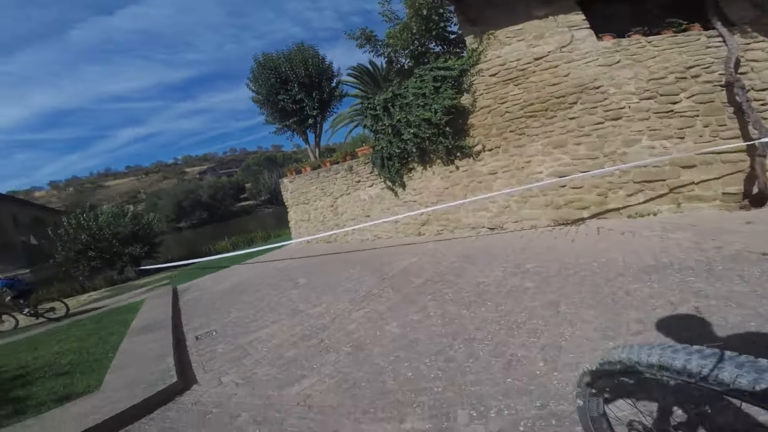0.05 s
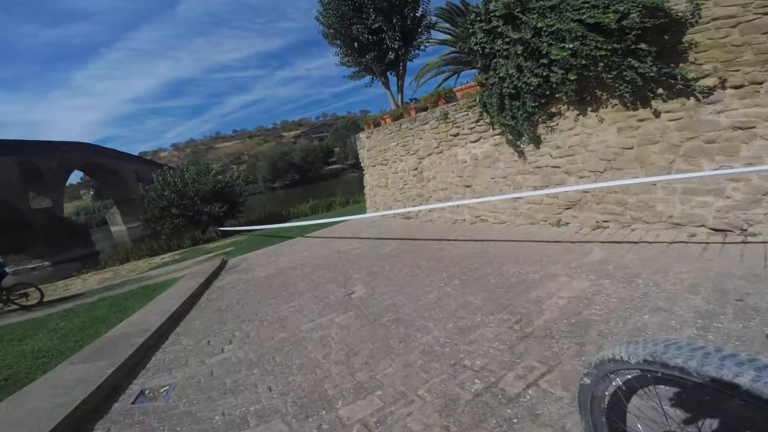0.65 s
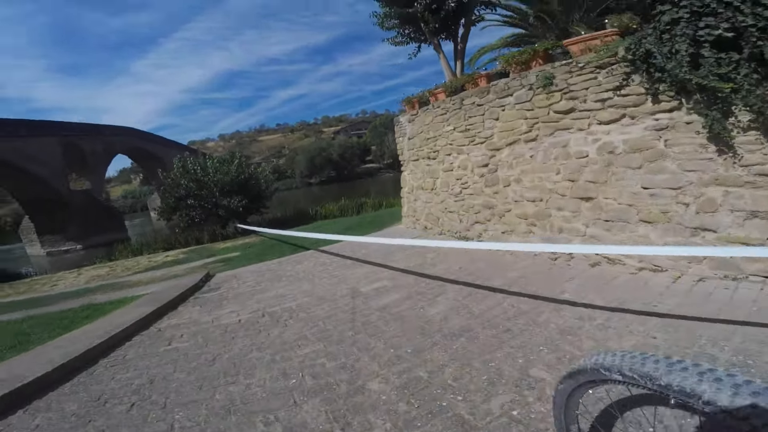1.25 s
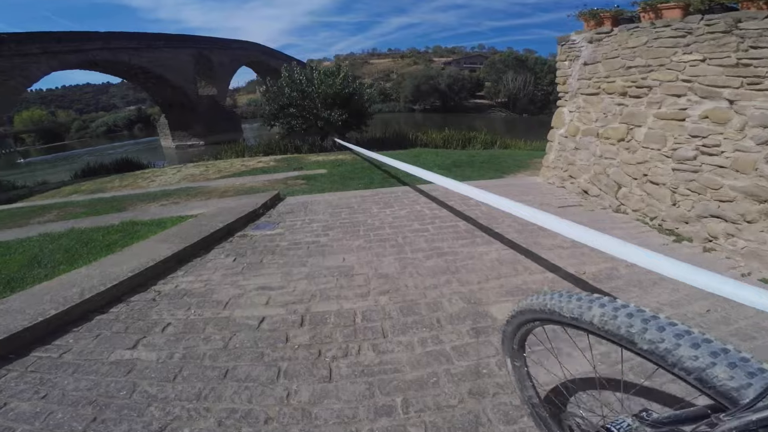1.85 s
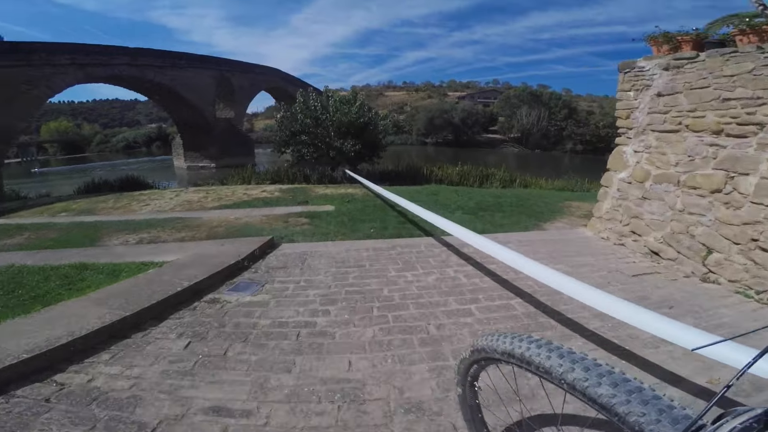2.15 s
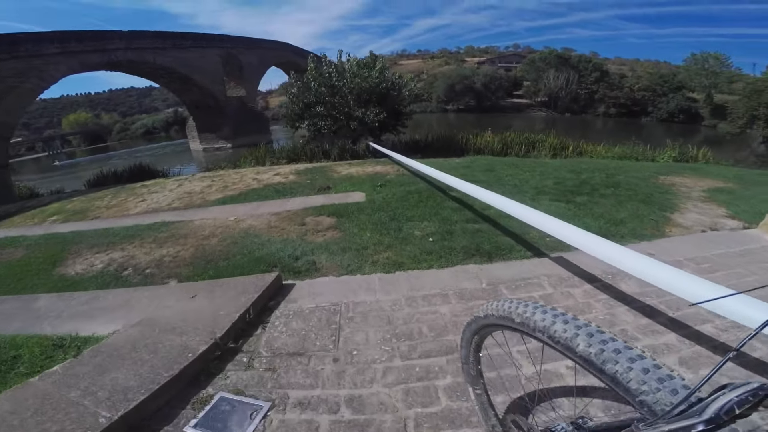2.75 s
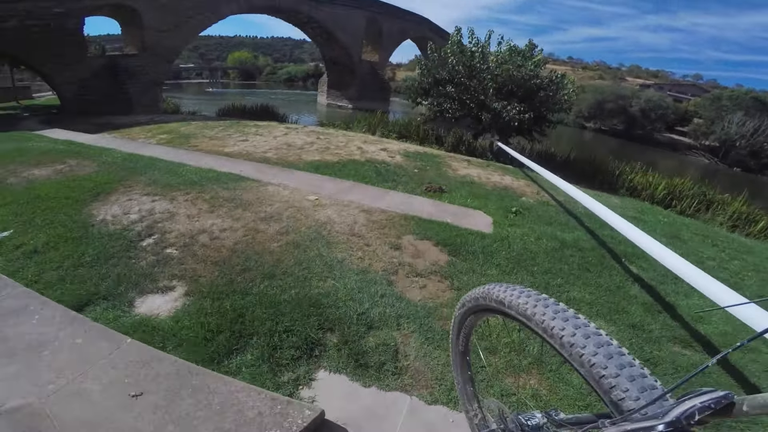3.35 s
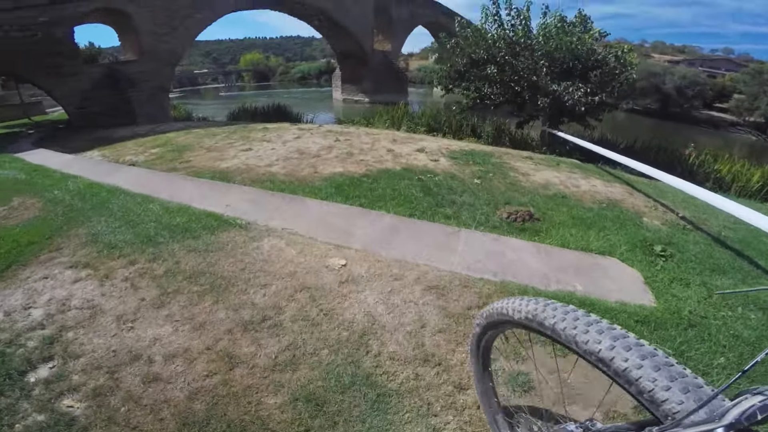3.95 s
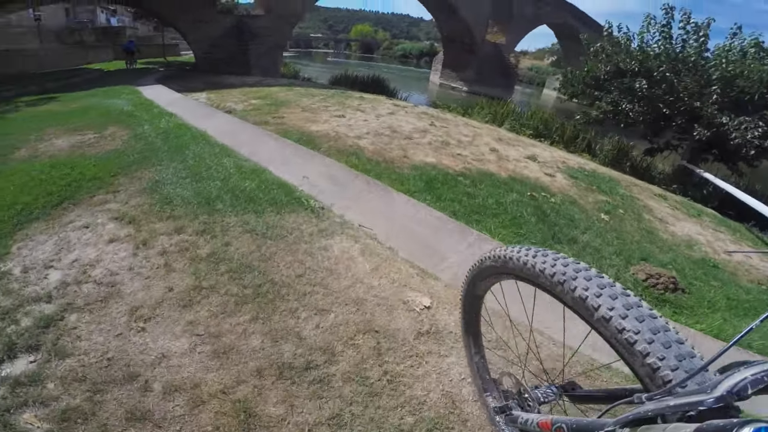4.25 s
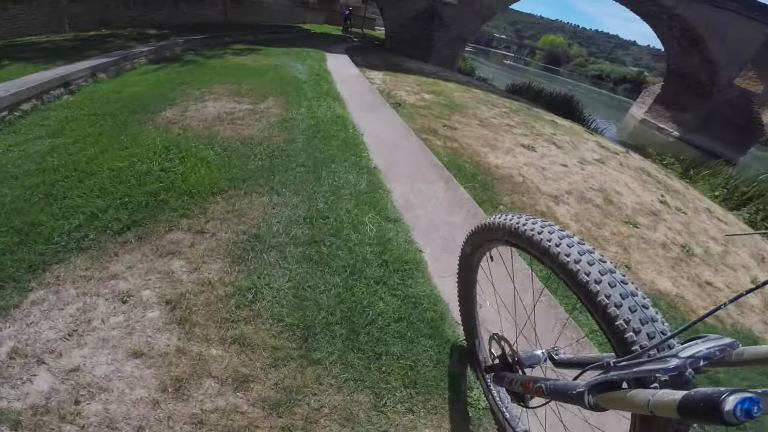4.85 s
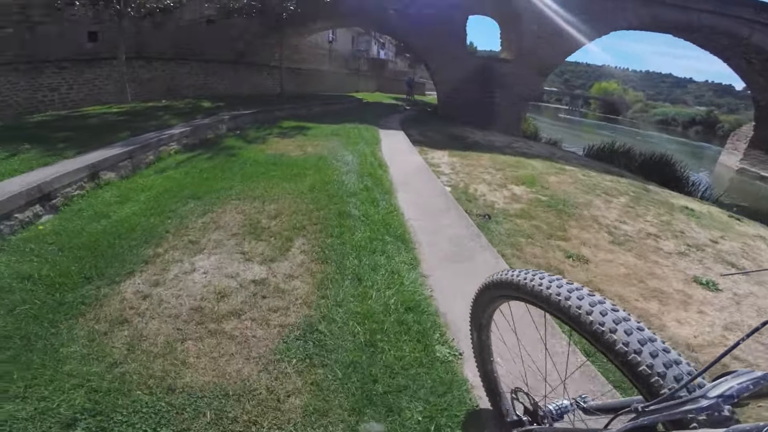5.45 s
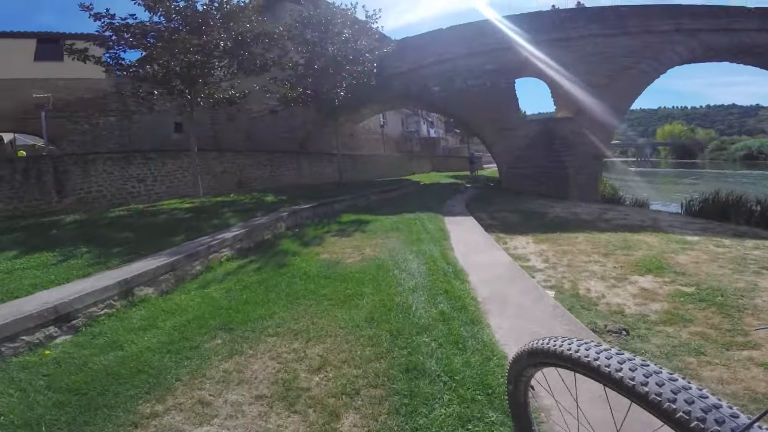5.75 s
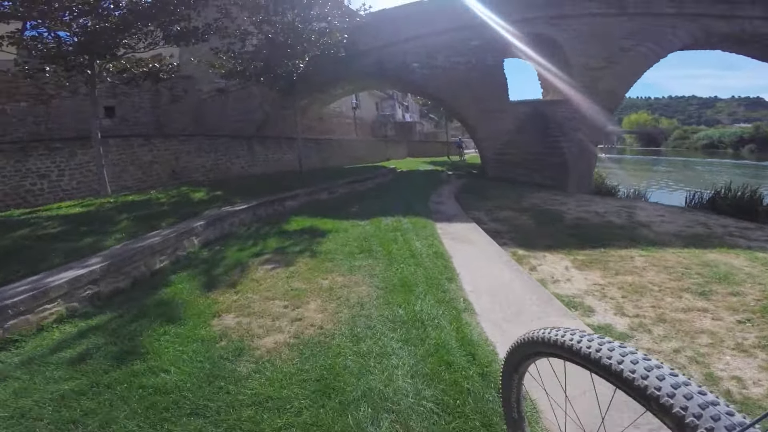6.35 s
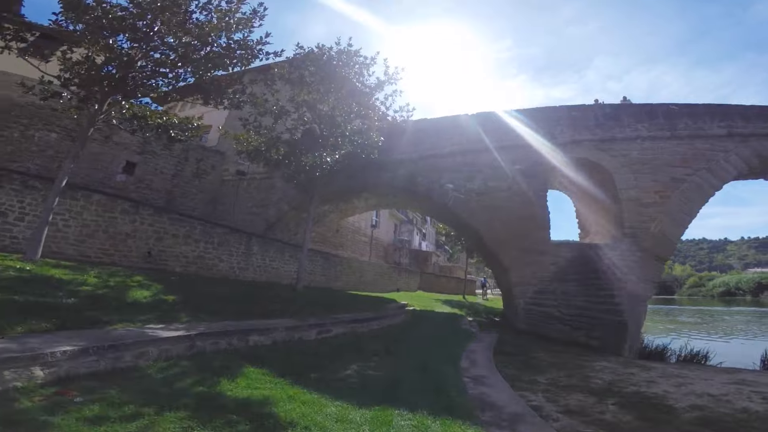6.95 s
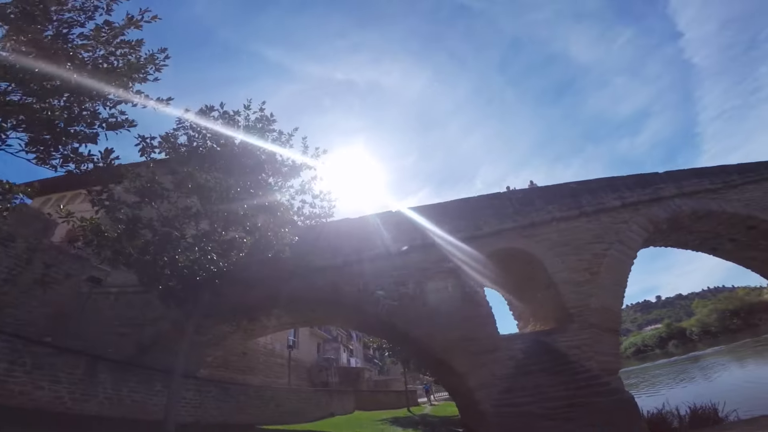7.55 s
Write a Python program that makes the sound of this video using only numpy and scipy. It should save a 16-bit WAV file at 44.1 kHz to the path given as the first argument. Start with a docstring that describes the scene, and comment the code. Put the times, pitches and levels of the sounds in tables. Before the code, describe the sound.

A mountain bike is heard close up from a microphone on the rider. From the start, a loose, hard fitting clacks sharply and irregularly, bouncing and ringing briefly, with light ticking between hits and low wind rumble underneath. The tyres roar, hiss and hum softly on stone paving. A brake disc gives thin, very high squeals around 0.4 seconds and again between 2 and 3 seconds. There is a dull bump at 1.6 seconds. From 3 to 4.3 seconds, low thuds and hard clacks bunch together as the bike drops down a step onto grass. It goes much quieter around 4.5 seconds, with a faint brake hiss. Clacks return near 4.9 seconds and grow busy from 5.5 to 6.4, with two thuds around 6. After that come only a few clacks and faint grass swishes, and the wind buffets harder from about 7.3 seconds to the end.

```python
"""Sharp clacks and chatter over a low rumble: a mountain bike rolls over stone paving, drops down a step
and runs out on grass, heard from a camera on the rider. Every jolt throws a loose, hard fitting beside
the microphone, which strikes, bounces and rings. Wind and bumps make the rumble. The tyres roar, hiss
and hum on the stone and swish through the grass, and now and then a brake disc rubs and sings thinly."""
import sys
import numpy as np
from scipy import signal
from scipy.fft import rfft, irfft
from scipy.io import wavfile
from scipy.ndimage import uniform_filter1d, minimum_filter1d

SR = 44100
rng = np.random.default_rng(int(sys.argv[2]) if len(sys.argv) > 2 else 0)


def int16_out(signal):
    """Quantize to a 16-bit WAV file."""
    q = np.round(np.clip(np.atleast_2d(signal).T, -1, 1) * 32767)
    wavfile.write(sys.argv[1], SR, q.astype(np.int16))


N = 340011
T = np.arange(N) / SR
LEAD = 256  # samples set aside for sliding before each blow
MIDDLING_DB = -30  # the level of a medium jolt

# Jolts that throw the loose fitting. Each row: time in seconds, level over the first 10 ms in dB,
# chatter time in ms, first rebound in dB compared with the blow.
JOLTS = [(.0067, -28.5, 11.5, -21), (0.1102, -24, 2.5, -27), (0.1623, -31, 1.3, -11),
         (0.1829, -23, 1.2, -8), (0.2624, -35, 0.89, -12), (.319, -28, 1, -9), (0.47, -29.5, 1.6, -33),
         (0.4752, -16, 0.8, -33), (0.5056, -17, 1.4, -30), (0.5515, -26.5, 1.2, -42),
         (0.58, -19, 1.5, -14.5), (0.6845, -25.5, 0.96, -8), (0.7779, -29.5, .5, -35),
         (.8152, -27.5, 1.1, -5), (0.9067, -17.5, 0.3, -27), (0.9571, -24, 1.5, -29),
         (1.031, -28.5, 1.4, -15), (1.203, -37.5, 1, -2.5), (1.322, -24.5, 1.1, -28),
         (1.3559, -22, 2.9, -18), (1.4189, -28, 2.1, -9), (1.455, -24.5, 0.96, -9), (1.51, -38.5, 1.2, -24),
         (1.5651, -35, 0.42, -9), (1.6417, -27, 3.1, -11.5), (1.744, -38, 1.9, -8),
         (1.841, -32.5, 2.1, -12), (1.8788, -30, 0.96, -1), (1.9526, -36.5, 1.4, -15),
         (1.996, -36.5, 2.2, -28), (2.1128, -35, 1.1, 1), (2.1525, -29.5, 1.2, -7.5),
         (2.2299, -23.5, 0.37, -8.5), (2.2618, -36.5, 2.7, -7), (2.3732, -31, 3.6, -3.5),
         (2.3939, -20, 0.37, -20), (2.4753, -30, 1.9, -16), (2.637, -26, 0.2, -17), (2.6733, -39, 2.8, -20),
         (2.7476, -38, 3.6, -8), (2.9771, -31.5, 1.8, -11), (3.0626, -28, 2.1, -35),
         (3.118, -37.5, 2.1, -29), (3.144, -27, 2.6, -15), (3.1519, -23, 1.1, -36), (3.184, -19, 2.5, -46),
         (3.214, -39, .9, -2.5), (3.2658, -30.5, 2.1, -1), (3.2995, -25, 0.38, -14),
         (3.322, -33.5, 3.4, -30), (3.4377, -28, 1, -7.5), (3.4795, -24.5, 0.82, -20),
         (3.5053, -25.5, 0.74, -41), (3.5315, -26.5, 1.2, -7), (3.5765, -34, 0.67, -2),
         (3.6184, -26.5, 2.2, -32), (3.6374, -22.5, 0.71, -21), (3.6674, -34.5, 3.1, -19),
         (3.69, -28, 2.8, -11), (3.721, -15.5, 0.84, -21), (3.7424, -32.5, 0.73, -2.5),
         (3.8678, -35, 7.5, -4), (3.927, -36.5, 1.4, -5.5), (4.015, -30, 1.8, -42), (4.038, -29, 2.5, -37),
         (4.1303, -27, 3.5, -3), (4.153, -19.5, 1.7, -11), (4.1934, -26, 5.4, -29), (4.2382, -41, 3.9, -23),
         (4.2817, -44.5, 3, -2.5), (4.4646, -44.5, 2.1, -24), (4.762, -47.5, 1.4, -26),
         (4.83, -44, 0.95, -28), (4.862, -31, 4.5, -31), (4.8841, -30, 1.3, -10), (4.9308, -46, 0.8, -29),
         (4.9843, -24.5, 1.1, -8.5), (5.041, -36, 2.7, -38), (5.147, -39.5, 1.5, -32),
         (5.1655, -44, .6, -39), (5.2124, -40.5, 0.4, -34), (5.3128, -49, 1.1, -20),
         (5.3536, -44, 1.3, -29), (5.373, -38, 3, -33), (5.4139, -33.5, 1.8, -32), (5.5054, -37, 1.9, -15),
         (5.54, -26.5, 0.84, -21), (5.5779, -35, 2.8, -26), (5.6189, -40, .6, -0.5),
         (5.6698, -26, 1.4, -9.5), (5.7733, -35.5, 1.2, -16), (5.8085, -23.5, 0.76, -22),
         (5.8225, -26, 4.7, -24), (5.9331, -27, 1.4, -5.5), (5.969, -23, 7.7, -26),
         (6.0249, -34.5, 1.6, -50), (6.0564, -22, 1.8, -44), (6.098, -39.5, 1.5, -2),
         (6.1299, -28, 1.1, -15), (6.169, -22, 3.7, -33), (6.2101, -41.5, 1.1, 1), (6.2452, -28, 0.31, -21),
         (6.276, -23, 5.4, -31), (6.3285, -46.5, 1.6, -32), (6.4027, -20, 0.55, -16.5),
         (6.43, -27, 3.4, -23), (6.514, -36.5, 1.8, -38), (6.635, -44.5, 1.9, -38), (6.9752, -48, 1.6, -25),
         (7.0301, -28, 1.5, -37), (7.1435, -30.5, 0.72, -11), (7.4931, -32.5, 0.57, -12.5)]
# The notes the fitting rings with. Each row: pitch in Hz, width in Hz (wider dies sooner), level in dB.
FITTING_NOTES = [(861, 46, -12.5), (1144, 190, -16), (1656, 83, -33), (1840, 480, -8), (2360, 100, -12.5),
                 (3897, 690, -8.5), (3880, 94, -12), (4315, 56, -10.5), (4834, 131, -2.5), (5770, 46, -16),
                 (6116, 380, -3), (7300, 640, -3.5), (8234, 500, -5.5), (7880, 1300, -7), (9975, 420, -9.5),
                 (12000, 1500, -7.5), (11870, 3200, -7.5), (14070, 930, -14.5)]
# How hard the ground shakes the fitting. Each row: time in seconds, level in dB.
GROUND_SHAKE = [(0, -53.5), (1.2, -49), (2.2, -48.5), (2.85, -57), (3.25, -48.5), (3.4, -58), (3.58, -44.5),
                (3.8, -50.5), (3.95, -54), (4.4, -67), (4.75, -68), (4.88, -60), (5.2, -70), (5.52, -58),
                (5.86, -62.5), (6.2, -45.5), (6.6, -60.5), (7.7, -81.5)]
# Wind at the microphone. Each row: time in seconds, slow sway in dB, quick buffeting in dB.
WIND_LEVELS = [(0, -27.5, -25), (.15, -34.5, -60), (.44, -34, -56), (.52, -27.5, -44.5), (1.15, -33, -48.5),
               (1.8, -27.5, -41), (2.62, -33.5, -39), (3.15, -33, -38), (3.62, -24.5, -36.5),
               (3.8, -45, -54), (4.22, -33.5, -42.5), (4.45, -50, -70), (4.75, -40, -62),
               (5.65, -40, -51.5), (6.1, -33.5, -43), (6.45, -32.5, -49), (7.21, -33.5, -47),
               (7.28, -23, -32.5), (7.42, -22.5, -35), (7.54, -36, -39), (7.71, -17.5, -34)]
# The tone colours of the sway and the buffeting. Each row: frequency in Hz, level in dB.
SWAY_COLOUR = [(10, -7), (22, 0), (38, -5), (55, -7), (80, -18), (130, -35), (300, -69.5), (3000, -120)]
BUFFET_COLOUR = [(35, -8.5), (70, 2.5), (120, -1.5), (190, -10.5), (290, -21.5), (420, -30), (800, -41),
                 (2000, -64.5), (15000, -103)]
# Bumps that reach the camera. Each row: time in seconds, peak level in dB, rise time in ms.
BUMPS = [(.062, -31.5, 11), (.49, -48, 9), (0.544, -35, 6.7), (1.385, -40, 9.5), (1.624, -23, 5),
         (1.939, -38, 5.5), (2.239, -48, 6.8), (2.981, -24.5, 9.3), (3.047, -28.5, 4.8), (3.154, -30.5, 11),
         (3.183, -22, 3.1), (3.351, -26, 6.4), (3.402, -26, 5.5), (3.442, -22.5, 4.7), (3.541, -26.5, 14),
         (3.719, -36, 2.7), (3.784, -42, 11), (3.922, -35.5, 14.4), (4.034, -36.5, 8.1),
         (4.148, -27.5, 4.1), (4.183, -39, 4.2), (4.329, -40, 6.3), (4.352, -31.5, 4.8),
         (4.708, -42.5, 13.4), (4.786, -41.5, 16), (5.673, -43, 8), (5.923, -27.5, 8.6), (6.013, -25.5, 6),
         (6.141, -38.5, 10), (7.645, -25.5, 4.9)]
# Rolling on stone, then earth, then grass. Each row: time in seconds, tyre roar in dB, grit hiss in dB.
ROLLING_LEVELS = [(0, -46.5, -51), (1.1, -49, -55), (3.1, -50, -56), (3.48, -52, -61.5), (3.61, -43, -62),
                  (3.88, -61, -48.5), (4.0, -63, -72), (4.13, -43, -63), (4.42, -71.5, -74),
                  (4.82, -60, -85), (5.25, -57, -89), (5.6, -54, -90), (6, -54.5, -93), (6.6, -62, -83.5),
                  (7.71, -62, -80)]
# The tone colours of the roar and the grit. Each row: frequency in Hz, level in dB.
ROAR_COLOUR = [(120, -18.5), (290, 12), (420, 8.5), (600, 9), (1100, 7), (2050, 9.5), (2900, 1),
               (4200, 0.5), (5500, -18.5), (8000, -19.5), (15000, -51.5)]
GRIT_COLOUR = [(1500, 0), (2400, 1), (3900, 8.5), (5400, -1), (7400, 3), (9000, 2.5), (10600, 9),
               (12500, -4), (15000, -16)]
# Tread knobs drumming on the paving. Each row: time in seconds, knob rate in Hz, level in dB.
TREAD_HUM = [(0, 290, -59), (.4, 286.4, -48.5), (1.25, 293.3, -58.5), (2.1, 293.4, -55), (3.0, 277, -75),
             (3.4, 280, -101)]
# The brake disc rubbing its pads. Each row: start in seconds, length in seconds, pitch in Hz,
# level in dB, width of the note in Hz (wider is rougher).
SQUEALS = [(0.263, 0.1, 12000, -44, 297), (0.373, 0.097, 11900, -37, 284), (1.97, .08, 11600, -56, 292),
           (2.466, 0.09, 11800, -42.5, 317), (2.652, 0.1, 11900, -44, 245), (2.85, 0.053, 11880, -50, 280),
           (6.5, 0.47, 12800, -68, 620)]
# The tone colour of the pads wiping the disc. Each row: frequency in Hz, level in dB.
WIPE_COLOUR = [(700, -16), (2200, 3), (3600, -1), (6000, -13), (9000, -13), (10600, -3), (12000, -20),
               (15000, -22)]
# Tyres brushing long, dry grass. Each row: start in seconds, length in seconds, level in dB.
SWISHES = [(4.817, 0.04, -47), (6.709, 0.073, -50.5), (6.775, 0.063, -53.5), (7.26, 0.065, -52),
           (7.312, 0.12, -54)]
# The tone colours of the grass and the open air. Each row: frequency in Hz, level in dB.
GRASS_COLOUR = [(400, 1), (1100, 7), (1900, 2.5), (3500, -0.5), (6500, -12), (10000, -29), (15000, -50)]
AIR_COLOUR = [(100, 17), (350, 4), (650, 0.5), (1000, 1), (2000, -10), (3200, -8), (5000, -9.5),
              (7500, -19), (11000, -25), (15000, -27.5)]


def rattle(paving_db=-50.5, slide_db=-17.5, heft=0.25, rebound_s=0.008):
    """Each jolt is a blow and two rebounds; on rough ground the fitting slides more and hits heavier."""
    shake_db, = curves(GROUND_SHAKE)
    out = np.zeros(N)
    flights = rebound_s * np.exp(0.2 * rng.standard_normal((len(JOLTS), 2)))
    for (s, db, chatter_ms, rebound_db), flight in zip(JOLTS, flights):
        rough_db = shake_db[int(s * SR)] - paving_db
        contact = dict(body_db=heft * rough_db, scrape_db=slide_db + rough_db)
        strike(out, s, db, chatter_ms, **contact)
        for delay, extra_db in zip(np.cumsum(flight), (0, 1)):
            strike(out, s + delay, db + rebound_db + extra_db, chatter_ms=1.33, **contact)
    return out


def strike(track, s, db, chatter_ms, body_db, scrape_db):
    """Add one blow: a stronger one is brighter; a flat landing chatters longer and sounds fuller."""
    treble_db = 0.2 * (db - MIDDLING_DB)
    flat_db = 1.27 * np.log2(chatter_ms / 2.2)  # 2.2 ms is a medium chatter
    add(track, s - LEAD / SR, clack(db, chatter_ms, treble_db, body_db + flat_db, scrape_db))


def clack(db, chatter_ms, treble_db, body_db=0, scrape_db=-22,
          scrape_ms=4, buzz_db=-22, buzz_ms=4.3, size=1280):
    """The fitting slides for a moment, strikes, chatters in tiny bounces and leaves a faint buzz."""
    ms = (np.arange(size) - LEAD) / SR * 1e3  # zero at the strike
    after = np.maximum(ms, 0)
    bounces = rng.standard_normal(size) * (rng.random(size) < 0.2) * (ms > 0)
    bounces *= np.exp(-after / (2 * chatter_ms) - (after / 13) ** 2)
    friction = rng.standard_normal(size)
    scrape = friction * np.exp(-abs(ms) / scrape_ms) * (ms < 0)
    buzz = friction * np.exp(-after / buzz_ms) * (ms > 0)
    impact = unit(1.0 * (ms == 0))
    blow = unit(impact + 0.49 * chatter_ms * unit(bounces))
    force = blow + undb(scrape_db) * chatter_ms * unit(scrape) + undb(buzz_db) * unit(buzz)
    # a harder hit is shorter and wakes the highest notes; a heavier one stirs the lowest
    hz = np.arange(size + 1) * SR / (2 * size)
    colour = undb(np.interp(hz, [2500, 5000, 7500, 10500], [body_db, 0, 0, treble_db]))
    # multiplying the spectra makes every little push start its own ring
    sound = irfft(rfft(force, 2 * size) * rfft(ring(), 2 * size) * colour)
    first_10_ms = sound[LEAD:LEAD + SR // 100]
    return sound * undb(db) / np.sqrt(np.mean(first_10_ms ** 2))


def ring(scatter_db=0.5, rise_ms=0.22, size=1024):
    """The fitting rings after one touch; each spot gives a slightly different mix of its notes."""
    hz, width, db = np.transpose(FITTING_NOTES)[:, :, None]
    scatter, phase = rng.standard_normal((2, len(hz), 1))
    t = T[:size]
    swing = np.sin(2 * np.pi * hz * t + np.pi * phase)
    fade = np.exp(-np.pi * width * t)
    notes = undb(db - scatter_db * scatter) * width * fade * swing
    return notes.sum(0) * (1 - np.exp(-t * 1e3 / rise_ms))


def ticks(spots=48):
    """The same fitting also jitters lightly at random, touching on a few dozen spots."""
    shake_db, = curves(GROUND_SHAKE)
    sounds = [clack(0, 0.437 + 0.58 * loose, treble_db=-0.5) for loose in rng.random(spots)]
    gaps, strengths, picks = rng.random((1000, 3)).T
    times = np.cumsum(0.23 + 1.2 * gaps) / 90  # about 108 ticks a second
    out = np.zeros(N)
    for s, strength, pick in zip(times, strengths, picks):
        if s < T[-1]:
            db = shake_db[int(s * SR)] - 33.5 + 46 * strength
            add(out, s - LEAD / SR, undb(db) * sounds[int(pick * spots)])
    return out


def wind(sway_gain_db=1, buffet_gain_db=3, gusty_db=5, lurch_sway_db=-38.5, lurch_buffet_db=-53.5):
    """Air and shaking at the microphone: a deep sway and quicker buffets, both swelling at each jolt."""
    sway_db, buffet_db = curves(WIND_LEVELS)
    jolted = lurch()
    sway_level = np.hypot(undb(sway_db + sway_gain_db), undb(lurch_sway_db) * jolted)
    buffet_level = np.hypot(undb(buffet_db + buffet_gain_db), undb(lurch_buffet_db) * jolted)
    sway = even_out(noise(SWAY_COLOUR), 0.06) * sway_level
    buffets = even_out(noise(BUFFET_COLOUR), 0.073) * buffet_level
    return sway + buffets * undb(gusty_db * wander(45))


def lurch(length_s=0.095, lead_s=0.044, follow=0.88):
    """How far the rider sways around each jolt: 1 for a medium jolt, more for a stronger one."""
    power = np.zeros(N)
    swell = arch(0, length_s)[:SR // 2] ** 2
    for s, db, _, _ in JOLTS:
        strength = undb(follow * (db - MIDDLING_DB))
        add(power, s - lead_s, (strength * swell) ** 2)
    return np.sqrt(power)


def thuds():
    """A bump shoves the camera: a few low, uneven swings that swell and die away."""
    level = np.zeros(N)
    for s, db, rise_ms in BUMPS:
        age = T[:SR // 10] * 1e3 / rise_ms  # reaches 1 at the peak
        add(level, s - 0.003, undb(db) * age * np.exp(1 - age))
    dull = noise([(60, 2.5), (150, 4), (280, -6), (400, -14.5),
                  (600, -25.5), (1000, -41), (3000, -75), (15000, -94)])
    return level * even_out(dull, 0.017)


def tyres(roar_gain_db=-2.5, hiss_gain_db=-1, patchy_db=5, grainy_db=3):
    """Knobs slap the ground in an uneven roar; grit hisses on stone and hardly at all on grass."""
    roar_db, hiss_db = curves(ROLLING_LEVELS)
    roar = noise(ROAR_COLOUR) * undb(roar_db + roar_gain_db + patchy_db * wander(110))
    grains = undb(grainy_db * wander(260))
    hiss = noise(GRIT_COLOUR) * undb(hiss_db + hiss_gain_db) * grains
    return roar + hiss


def tread_hum(wobble=0.067, octave_db=-11):
    """The row of knobs drums a faint note, which the joints of the paving keep unsteady."""
    hz, db = curves(TREAD_HUM)
    phase = 2 * np.pi * np.cumsum(hz * (1 + wobble * wander(70))) / SR
    note = np.sin(phase) + undb(octave_db) * np.sin(2 * phase)
    return undb(db + wander(30)) * note


def brake(wipe_start_s=4.36, wipe_end_s=4.76, wipe_db=-59.5):
    """The disc grazes the pads and sings a thin, rough note; once they wipe it with only a hiss."""
    squeals = np.zeros(N)
    for s, length, hz, db, width_hz in SQUEALS:
        phase = 2 * np.pi * hz * T
        # friction keeps changing the size and timing of the disc's swing
        note = wander(width_hz) * np.sin(phase) + wander(width_hz) * np.cos(phase)
        squeals += undb(db) * arch(s, length) ** 2 * note
    press = np.clip((T - wipe_start_s) / 0.23, 0, 1)
    release = np.clip((wipe_end_s - T) / 0.038, 0, 1)
    return squeals + undb(wipe_db) * press * release * noise(WIPE_COLOUR)


def grass(crisp_db=6):
    """Blades of grass flick against the tyre in soft swishes."""
    swell = sum(undb(db) * arch(s, length) for s, length, db in SWISHES)
    return swell * unit(noise(GRASS_COLOUR) * undb(crisp_db * wander(200)))


def open_air(db=-59.5):
    """The faint, steady rush of the open air by a river."""
    return undb(db) * noise(AIR_COLOUR)


def undb(db):
    """Turn decibels into a number to multiply by."""
    return 10 ** (np.asarray(db) / 20)


def unit(x):
    """Scale a sound to an average (rms) level of 1."""
    return x / np.sqrt(np.mean(x ** 2))


def curves(table):
    """Join a table's timed rows with straight lines: one curve for each column after the time."""
    s, *columns = np.transpose(table)
    return [np.interp(T, s, column) for column in columns]


def arch(start_s, length_s):
    """Half a sine wave, rising from 0 to 1 and falling back."""
    return np.sin(np.pi * np.clip((T - start_s) / length_s, 0, 1))


def add(track, s, sound):
    """Mix a sound into the track, starting at s seconds."""
    start = max(int(round(s * SR)), 0)
    track[start:start + len(sound)] += sound[:max(N - start, 0)]


def wander(per_second):
    """A curve that glides between random values, mostly from -1 to 1."""
    points = rng.standard_normal(N // 16)
    return np.interp(T * per_second, np.arange(len(points)), points)


def noise(colour):
    """Noise at level 1, shaped by rows of frequency in Hz and level in dB."""
    hz, db = np.transpose(colour)
    all_hz = np.arange(N // 2 + 1) * SR / N
    shape = undb(np.interp(np.log(all_hz + 1), np.log(hz), db))
    return unit(irfft(rfft(rng.standard_normal(N)) * shape, N))


def even_out(x, seconds):
    """Smooth away a noise's chance swells, so it follows the level it is given."""
    return x / np.sqrt(uniform_filter1d(x ** 2, int(seconds * SR)) + 0.027)


def scene():
    """The bike, close to the one microphone, over the faint open air."""
    rolling = wind() + thuds() + tyres() + tread_hum() + grass() + brake()
    return (rolling + rattle() + ticks() + open_air())[None]


def record(dry, ceiling=0.55, top_hz=15250):
    """The camera quickly turns down the tallest peaks and cuts the highest treble."""
    gain = np.minimum(1, ceiling / (abs(dry) + 1e-9))
    gain = uniform_filter1d(minimum_filter1d(gain, size=89), size=89)  # hold and smooth over 2 ms
    treble_cut = signal.ellip(8, 0.2, 70, top_hz, fs=SR, output="sos")
    return signal.sosfilt(treble_cut, dry * gain)


dry = scene()
out = record(dry)
int16_out(out)
```